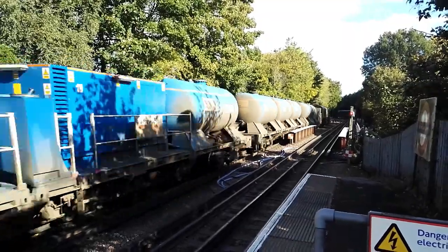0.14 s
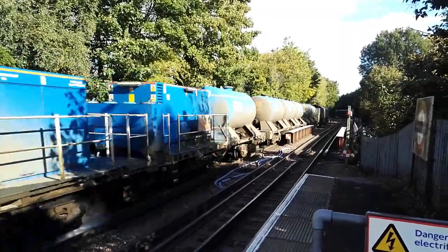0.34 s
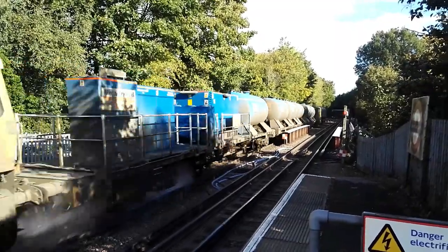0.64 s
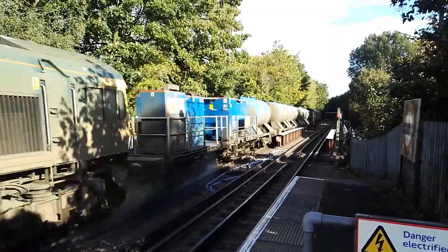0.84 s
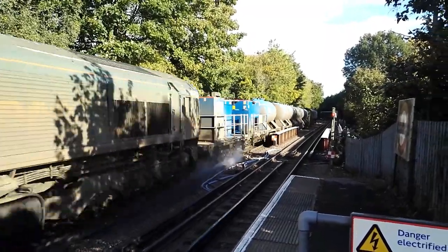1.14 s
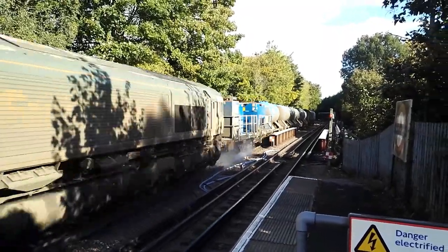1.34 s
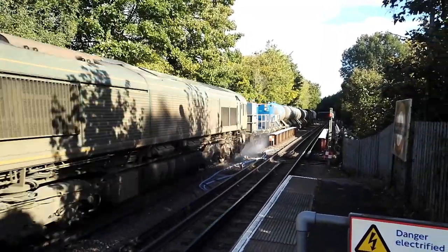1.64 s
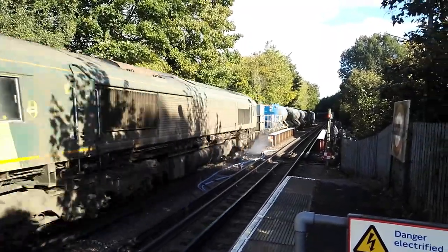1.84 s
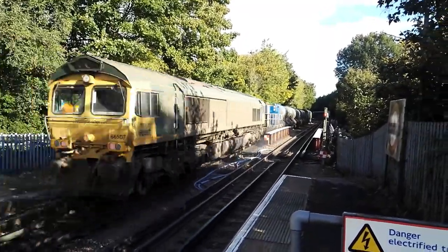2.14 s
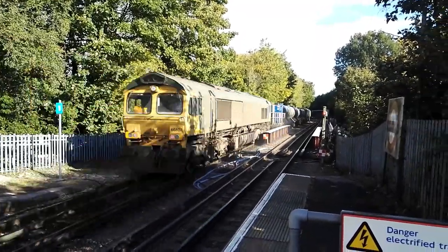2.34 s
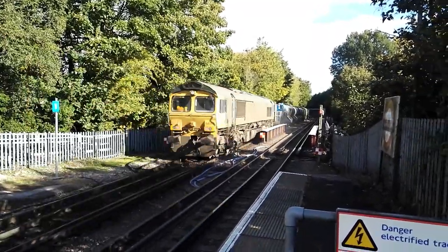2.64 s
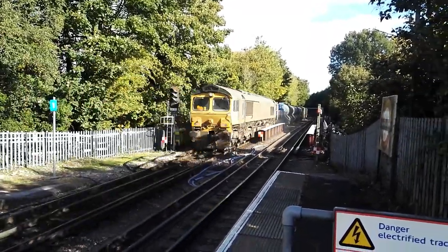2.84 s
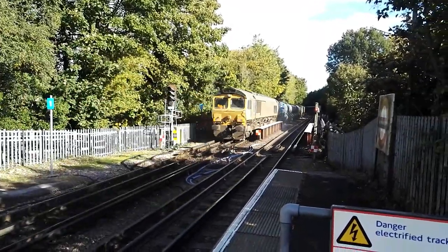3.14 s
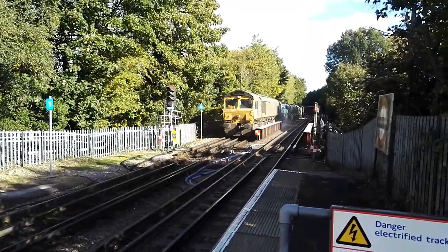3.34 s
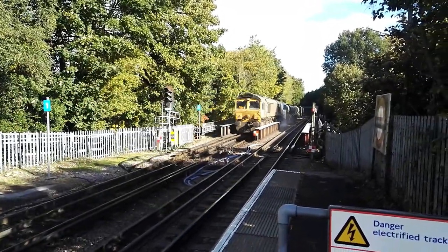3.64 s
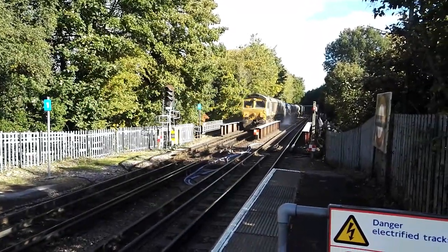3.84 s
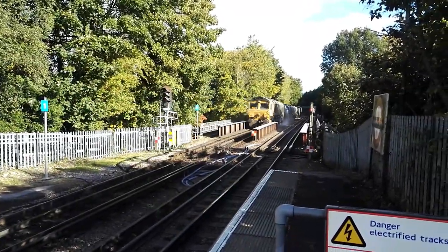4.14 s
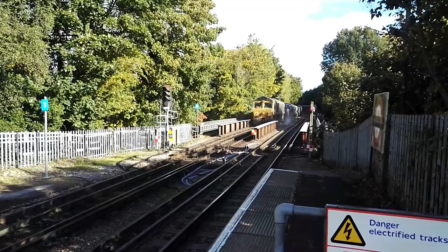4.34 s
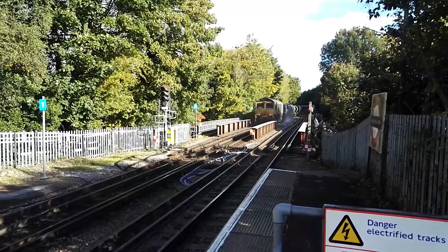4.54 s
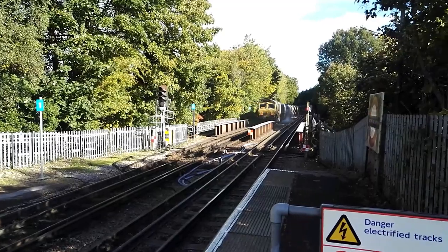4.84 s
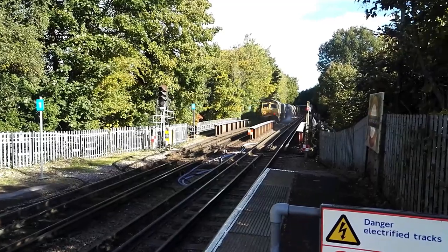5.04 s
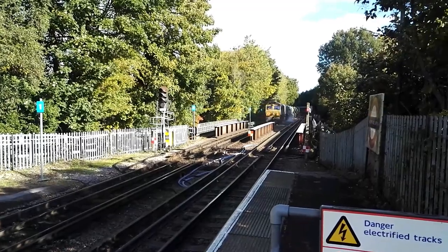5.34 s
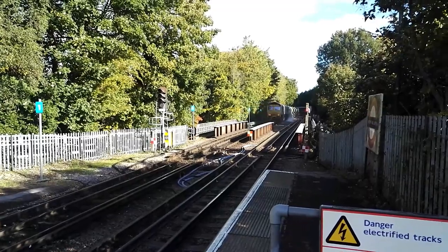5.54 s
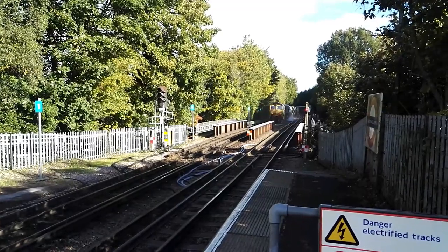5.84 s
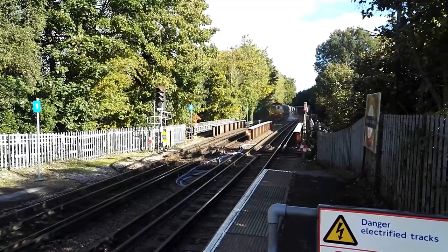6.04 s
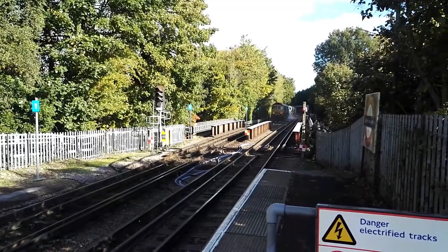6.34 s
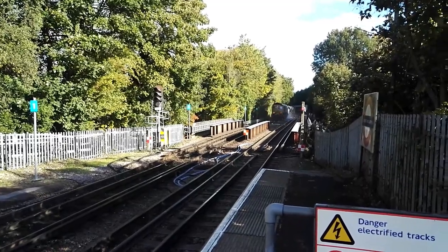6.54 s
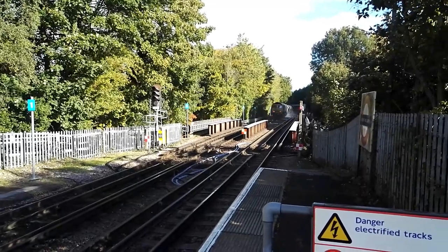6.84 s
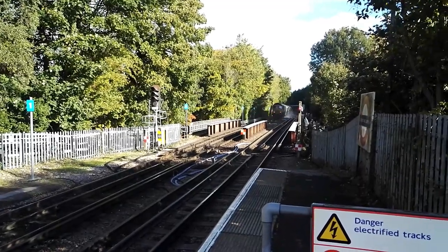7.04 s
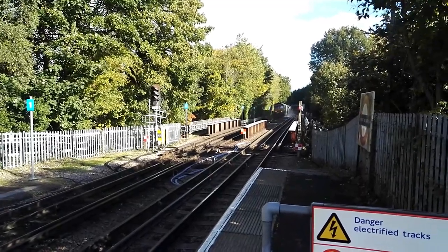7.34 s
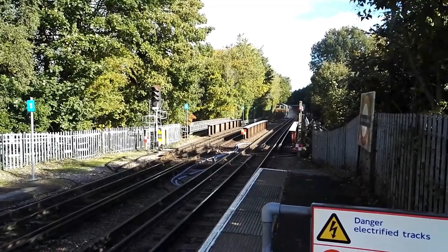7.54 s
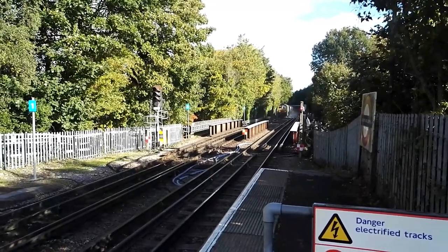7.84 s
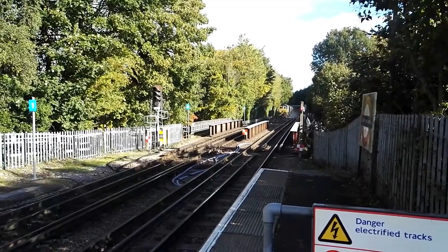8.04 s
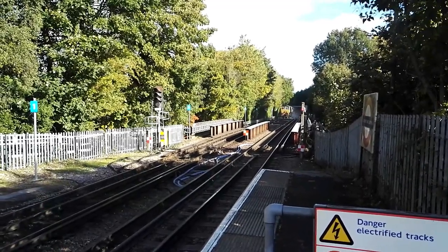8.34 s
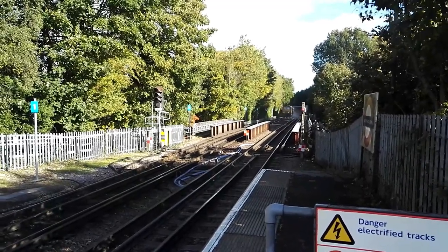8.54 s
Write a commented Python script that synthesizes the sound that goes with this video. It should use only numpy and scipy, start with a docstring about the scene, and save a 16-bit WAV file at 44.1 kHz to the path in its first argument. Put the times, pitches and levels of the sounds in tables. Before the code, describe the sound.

Close outdoor stereo from a station platform: a water-jetting train is already abreast, at its loudest, with bright crackling spray, rumbling bogies and rapid axle thuds. A diesel locomotive throbs past, an air valve spits, and wheels squeak faintly. After about two seconds it recedes; flanges sizzle over points, a steel bridge drones softly, and the hiss dulls and surges in the distance while breeze bumps the microphone.

```python
"""Rail-cleaning train passing a platform

Water jets and droplets are shaped random noise; wheel rumble, ringing rails and bridge are noise through resonances.
Axle blows excite decaying modes; the diesel and pump are harmonic series; fans and valve are noise bursts.
Parts of the train fade as powers of distance, and the hiss and rumble shift from near to far colours.
Far off, flanges sizzle through the points, a bridge booms, and a breeze buffets two microphone ports."""
import sys
import numpy as np
from scipy import signal
from scipy.fft import rfft, irfft, next_fast_len
from scipy.io import wavfile
from scipy.ndimage import uniform_filter1d

SR = 44100
rng = np.random.default_rng(int(sys.argv[2]) if len(sys.argv) > 2 else 0)


def bounce(signal):
    """Save signal as a 16-bit WAV file at the path given by the first command-line argument."""
    frames = np.transpose(np.atleast_2d(signal))
    limited = np.clip(frames, -1, 1)
    pcm = np.round(limited * 32767).astype(np.int16)
    wavfile.write(sys.argv[1], SR, pcm)


N = 384111

# In spectra and modes level_db is relative, since each sound is then scaled to rms 1.
# Surges of the train's noise, before each layer takes its share:
# start_s, rise_s, fade_s, hiss_db, roar_db, brightening (0-1)
SURGES = [(0, .024, 0.0097, 4, 11, 0), (3.22, 0.32, 0.43, 2.5, 1, 0.13), (4.35, .25, 0.6, 2, -2, 0.24),
          (5.33, 0.1, 0.81, 4, 4, 0.03), (6.64, .04, 0.77, 1.5, 4.5, 0.03), (7.93, 0.062, 1.6, 2, 4, 0.05)]
# Water jets and wheels hissing on wet track: abreast_s, gap_m, level_db (abreast)
HISSERS = [(-.05, 4.65, -22), (.6, 9.7, -33.5), (1.33, 3.3, -36.5), (1.88, 2.3, -44.5)]
# Dips of the hiss: centre_s, length_s, level_db
LULLS = [(2.944, 1.14, -3), (4.1, 0.93, -2.5), (6.447, 0.54, -1.8), (7.801, .35, -0.5)]
# Jet hiss, near and far: frequency_hz, level_db (per Hz)
HISS_NEAR = [(400, -10), (1000, -6), (1250, -4), (1700, -3.5), (2050, -1), (3200, -1), (4500, 1.5),
             (6200, 1), (8500, 6), (10500, 3), (12500, -1), (14200, 0)]
HISS_FAR = [(400, -23), (1100, 6), (1350, 2.5), (1600, 6.5), (2300, 2), (3300, 1.5), (4800, 1),
            (6200, -1.5), (8000, -4.5), (10000, -11), (11600, -11.5), (12400, -16.5), (14200, -21)]
# Wheel discs: pitch_hz, width_hz, level_db
WHEEL_MODES = [(1145, 110, 4), (1635, 30, -3), (2840, 40, 2), (4620, 160, -2), (11600, 400, -22)]
# Fine spray: frequency_hz, level_db (per Hz)
SPRAY_SPECTRUM = [(6000, -35.5), (8500, -11.5), (10300, -5), (11700, -1), (12800, -4.5), (14200, -7)]
# Bogies rolling by: abreast_s, gap_m, rumble_db, rail_ringing_db (both before the surges)
BOGIES = [(.08, 4.8, -42.5, -45), (.7, 4.3, -47.5, -49), (1.2, 5.5, -44, -49.5), (2.05, 2.8, -50.5, -50.5)]
# Wheel rumble, near and far: frequency_hz, level_db (per Hz)
RUMBLE_NEAR = [(20, -27.5), (40, -16), (58, -2.5), (80, 2), (105, 2.5), (130, -4.5), (175, -1), (250, -0.5),
               (315, -2.5), (380, -1), (470, -4.5), (560, -5.5), (900, -32), (1600, -30)]
RUMBLE_FAR = [(20, -8), (40, 0), (58, 12.5), (88, 5.5), (120, -5.5), (160, -0.5), (205, -0.5), (280, -1.5),
              (340, -10), (480, -6), (900, -8), (1600, -23.5)]
# Ringing rails, near and far: frequency_hz, level_db (per Hz)
RAILS_NEAR = [(350, -24), (500, -17.5), (600, -2.5), (680, -0.5), (745, 2), (795, -1.5), (860, -14.5),
              (1100, -24.5)]
RAILS_FAR = [(350, -17), (500, -8), (620, -1), (730, -1), (790, -3.5), (880, -10.5), (1100, -18.5)]
# Axle blows over rail joints: time_s, level_db (before the rattle and thud trims), pitch_hz
KNOCKS = [(0.019, -28, 211), (0.11, -35, 463), (0.129, -35, 404), (0.188, -32, 194), (0.31, -29.5, 242),
          (0.429, -39, 369), (0.489, -34, 269), (0.539, -33, 283), (0.609, -32, 272), (0.649, -38, 315),
          (0.738, -36, 175), (0.784, -40, 398), (0.892, -32, 180), (0.949, -34, 318), (1.024, -41, 248),
          (1.069, -35.5, 277), (1.099, -36, 317), (1.165, -32, 277), (1.285, -40, 175), (1.322, -37, 153),
          (1.359, -38, 159), (1.427, -35, 393), (1.719, -36, 106), (1.749, -35, 183), (1.847, -33, 110),
          (1.893, -38, 245), (1.977, -35, 183), (2.009, -35.5, 250), (2.238, -44, 410), (3.108, -52, 148)]
# Bogie frame: pitch_hz, level_db, decay_s
BOGIE_MODES = [(62, -9, .03), (108.6, -2.5, .028), (178, -0.5, 0.018), (240.6, -3, 0.014),
               (297.6, -1.5, .015), (400, -2.5, 0.012)]
# Rattle of an axle blow: frequency_hz, level_db (per Hz)
RATTLE_SPECTRUM = [(30, -24), (65, -2.5), (170, 0.5), (280, 2), (450, -8), (750, -12.5), (1200, -27.5),
                   (4000, -39)]
# Exhaust note as the locomotive goes by: time_s, level_db (before a trim and the final fade)
EXHAUST_LEVEL = [(0.0, -48), (0.05, -47), (0.1, -56), (0.28, -42.5), (0.48, -48.5), (0.82, -44.5),
                 (0.87, -62), (0.89, -50), (1.01, -45), (1.06, -56), (1.23, -49), (1.43, -64), (2.05, -52),
                 (2.07, -70), (2.55, -55.5), (2.58, -65), (2.71, -55), (2.77, -72.5), (2.81, -58),
                 (3.0, -69)]
# Diesel overtones: multiple of the firing rate, level_db
FIRING_ORDERS = [(1, -0.5), (2, -11.5), (3, -19), (4, -23.5)]
# Air valve: frequency_hz, level_db (per Hz)
VALVE_SPECTRUM = [(2500, -13), (4800, -8), (6500, -4), (8500, 2.5), (11000, 0), (14000, -1.5)]
# Cooling fans: frequency_hz, level_db (per Hz)
FAN_SPECTRUM = [(700, -24), (1200, -3), (1550, 2), (2150, 1), (2800, -18)]
# Pump pitch, dropping as the motor recedes: time_s, pitch_hz
PUMP_PITCH = [(1.1, 106.8), (2, 102.4)]
# Pump overtones: multiple of its pitch, level_db
PUMP_ORDERS = [(1, -6.5), (2, 0), (3, -2.5)]
# Wheel squeaks: centre_s, pitch_hz, level_db
SQUEAKS = [(1.509, 1917, -53), (1.655, 1657, -48), (1.811, 1600, -62), (1.97, 1650, -53.5),
           (2.11, 1545, -61.5), (2.29, 1640, -58), (2.6, 1654, -62), (2.902, 1690, -63)]
# Flanges scraping through the points: start_s, length_s, level_db
SCRAPES = [(2.273, 0.093, -53), (2.58, 0.087, -50.5), (3.217, 0.32, -62), (3.569, 0.19, -52.5),
           (3.8, 0.14, -57), (4.02, .05, -62), (4.159, 0.1, -52.5), (4.44, 0.075, -62), (4.86, 0.18, -58),
           (5.29, 0.24, -56.5), (5.628, .33, -69)]
# Flange scrape: frequency_hz, level_db (per Hz)
SCRAPE_SPECTRUM = [(8500, -8), (10200, -11), (11200, -2), (12000, -0.5), (13000, -5), (14200, -3)]
# Singing flange: centre_s, length_s, pitch_hz, level_db
SINGS = [(3.928, 0.16, 12350, -63), (5.461, .28, 12260, -61)]
# Wet wheels in the points: frequency_hz, level_db (per Hz)
SWISH_SPECTRUM = [(2500, -14), (4500, -3), (6500, -1), (9000, 0), (12000, -8)]
# Steel bridge: pitch_hz, width_hz, level_db
BRIDGE_MODES = [(164, 28, 0)]
# Faint tones from down the line: pitch_hz, width_hz, level_db
FAR_TONES = [(309, 26, -74.5), (2920, 45, -76), (4620, 80, -77)]
# Gusts on the ports: centre_s, length_s, left_db, right_db
GUSTS = [(4.27, 0.15, -57, -58.5), (4.408, 0.1, -54, -47), (4.497, .04, -66, -49.5), (4.566, 0.1, -65, -55),
         (4.66, .04, -66, -55), (4.693, 0.026, -59, -47.5), (4.84, 0.12, -60, -59),
         (4.969, 0.097, -55, -49), (5.04, 0.032, -70, -56), (5.395, 0.033, -50.5, -59),
         (5.448, .035, -62, -52), (5.515, 0.097, -55.5, -62), (5.605, 0.047, -61, -52),
         (5.688, .12, -57.5, -63), (5.774, 0.032, -60, -48.5), (5.915, 0.22, -65, -60.5),
         (6.431, 0.087, -61, -54.5), (6.528, 0.054, -62, -56), (6.578, .035, -72, -55),
         (6.643, 0.034, -68, -54)]
# Wind at a port: frequency_hz, level_db (per Hz)
GUST_SPECTRUM = [(20, -1), (60, 4), (150, 2.5), (290, -3.5), (430, -14), (800, -33), (2000, -50)]
# Balance of the two microphone ports: frequency_hz, left_minus_right_db
PORT_BALANCE = [(100, 0.2), (350, -0.3), (1000, 1.5), (2500, 1.5), (4000, -1.7), (5800, -5), (7500, -2),
                (9300, 3), (11500, 3.5), (14000, 2.5)]

SPEED_M_PER_S = 14.14
# farness crosses zero at NEAR_UNTIL_S and approaches FARTHEST over the scale DULLING_M
NEAR_UNTIL_S, DULLING_M, FARTHEST = 0.37, 69.4, 1.18
SCRAPE_ATTACK_S, SCRAPE_RELEASE_S = 0.032, 0.09
FIRING_HZ = 73
PORT_SPACING_S = 0.00052  # travel time of sound between the ports
# how far the left port leads for sound from beside the platform and from down the line
LEAD_BESIDE_MS, LEAD_AHEAD_MS = 0.442, -0.082
EDGE_HZ = 14240  # upper band limit
T = np.arange(N) / SR
SIZE = next_fast_len(N)
HZ = np.fft.rfftfreq(SIZE, 1 / SR)


def amp(db):
    """Logarithmic level: decibels to pressure gain."""
    return np.exp(np.asarray(db) * (np.log(10) / 20))


def evened(x):
    """Mean power: scales a signal to rms 1."""
    return x / np.sqrt(np.mean(x ** 2) + 1e-20)


def steadied(x, size=1100):
    """Short-time power: holds rms 1 over a sliding window, so a short burst has its full weight."""
    power = abs(uniform_filter1d(x ** 2, size=size, axis=-1))
    return x / np.sqrt(power + 1e-9)


def colour(points, hz):
    """Spectral envelope: interpolates decibels on a log-frequency axis."""
    f, db = np.transpose(points)
    return np.interp(np.log(hz + 1), np.log(f), db)


def band(points, hz):
    """Band limiting: an envelope that falls 20 dB per octave further past its ends."""
    inside = np.clip(hz + 1, points[0][0], points[-1][0])
    return colour(points, hz) - 20 * abs(np.log2((hz + 1) / inside))


def tinted(x, spectrum):
    """Linear filtering: multiplies by a spectral envelope, to rms 1."""
    return evened(irfft(rfft(x, SIZE) * amp(band(spectrum, HZ)), SIZE)[..., :N])


def drift(rate_hz, size=2048):
    """Low-pass random modulation: a slow wander of rms 1."""
    hz = np.fft.rfftfreq(size, T[-1] / size)
    wander = irfft(rfft(rng.standard_normal(size)) * np.exp(-(hz / rate_hz) ** 2))
    return evened(np.interp(T, np.linspace(0, T[-1], size), wander))


def pan(side_db):
    """Interaural level difference: left and right gains, positive to the left."""
    return amp(np.array([[.5], [-.5]]) * side_db)


def bell(centre_s, length_s):
    """Gaussian envelope: length_s spans its 1/e points."""
    offset = 2 * (T - centre_s).astype(np.float32) / length_s
    return np.exp(-np.minimum(offset ** 2, 20))


def burst(start_s, attack_s, length_s, release_s, t=T):
    """Exponential decay: a linear rise, a hold to length_s after the start, then decay."""
    age = (t - start_s).astype(np.float32)
    return np.clip(age / attack_s, 0, 1) * np.exp(-np.clip((age - length_s) / release_s, 0, 20))


def passing(abreast_s, gap_m, falloff):
    """Geometric spreading: gain 1 abreast, falling as a power of distance."""
    along_m = SPEED_M_PER_S * (T - abreast_s).astype(np.float32)
    return (1 + (along_m / gap_m) ** 2) ** (-falloff / 2)


def together(*gains):
    """Incoherent addition: unrelated noises add in power."""
    return np.sqrt(sum(gain ** 2 for gain in gains))


def surge(share):
    """Amplitude modulation: gain of a hissing layer that takes a share of the surges."""
    lift_db = sum(db * burst(s, rise, rise, fade) for s, rise, fade, db, _, _ in SURGES)
    return amp(share * lift_db)


def farness(t):
    """Dulling with distance: near 0 to about 1 far; a surge brightens it for a while."""
    receded = FARTHEST * (1 - np.exp(-SPEED_M_PER_S * (t - NEAR_UNTIL_S) / DULLING_M))
    bright = sum(share * burst(s, rise, rise, fade, t) for s, rise, fade, _, _, share in SURGES)
    return receded - bright


def noise(near, far, patchy_db, direct_near, direct_far, size):
    """Partial coherence: turbulent noise at two ports, direct and diffuse, rms 1, following farness."""
    hz = np.fft.rfftfreq(size, 1 / SR)
    t = np.arange(4 * N // size + 5) * size / 4 / SR
    a, b, c, d, patches = rng.standard_normal((5, len(t), len(hz)), dtype=np.float32)
    patches = uniform_filter1d(patches, size=12, axis=0)  # smooth in time, then in frequency
    patches = evened(uniform_filter1d(patches, size=3, axis=1))
    away = farness(t)[:, None].astype(np.float32)
    # part arrives direct, from beside or from ahead, the rest from all sides
    beside = np.clip(direct_near * (1 - 2 * away), 0, 1)
    ahead = np.clip(direct_far * away, 0, 1)
    direct = beside * np.exp(-2j * np.pi * hz * LEAD_BESIDE_MS / 1000)
    direct = direct + ahead * np.exp(-2j * np.pi * hz * LEAD_AHEAD_MS / 1000)
    diffuse = np.clip(0.78 + 0.14 * away, 0, 1) * np.sinc(2 * hz * PORT_SPACING_S)
    # direct sound loses its coherence at short wavelengths
    same = (1 - beside - ahead) * diffuse + direct / (1 + (hz / 6500) ** 4)
    same = same.astype(np.complex64)
    left = a + 1j * b
    right = same * left + np.sqrt(np.maximum(1 - abs(same) ** 2, 0)) * (c + 1j * d)
    ports = np.array([left, right])
    level_db = (1 - away) * band(near, hz) + away * band(far, hz) + patchy_db * patches
    ports *= amp(level_db).astype(np.float32)
    _, sound = signal.istft(ports, nperseg=size, noverlap=size - size // 4, time_axis=1, freq_axis=2)
    return evened(sound[:, :N])


def ring(modes, channels=2):
    """Resonance: modes kept going by random rubbing, rms 1."""
    response = sum(amp(db) / (1 + (2 * (HZ - hz) / width) ** 2) for hz, width, db in modes)
    rubbing = rng.standard_normal((channels, N))
    return evened(irfft(rfft(rubbing, SIZE) * response, SIZE)[:, :N])


def hum(pitch_hz, orders, waver, throb_db):
    """Harmonic series: a motor note with overtones that each throb a little, rms 1."""
    turns = np.cumsum(pitch_hz * (1 + waver * drift(5.3))) / SR
    note = 0
    for k, db in orders:
        overtone = np.sin(2 * np.pi * (round(k) * turns + rng.random()))
        note = note + amp(db + throb_db * drift(9.94)) * overtone
    return evened(note)


def hiss(falloff=1.62, far_db=-61.0, discs_db=-19):
    """Turbulent noise: jets scour the rails, the locomotive runs over wet track, discs sing from afar."""
    level = together(amp(far_db), *(amp(db) * passing(s, gap, falloff) for s, gap, db in HISSERS))
    wash = noise(HISS_NEAR, HISS_FAR, patchy_db=2.0, direct_near=0.16, direct_far=0.38, size=1024)
    discs = ring(WHEEL_MODES) * amp(discs_db) * np.clip(farness(T), 0, 1)
    lull = amp(sum(db * bell(s, length) for s, length, db in LULLS))
    return (wash + discs) * level * lull * surge(share=0.93)


def sizzle(level_db=-19, air_db_per_m=0.82, side_db=9.5, centring_m=38,
           grain_db=3.5, drops_per_s=2500, grainy=.55, reach_s=1.53):
    """Impulse noise and air absorption: drops tick in smooth fizz, moving from the left to the centre."""
    ticks = (rng.random((2, N)) < drops_per_s / SR) * rng.choice([-1, 1], (2, N))
    drop_db = grain_db * np.minimum(rng.exponential(1, (2, N)), 2)
    ticks = evened(ticks * amp(drop_db))
    share = np.clip(grainy, 0, 1) * np.exp(-T / reach_s)  # single drops are heard only close by
    mixed = np.sqrt(share) * ticks + np.sqrt(1 - share) * rng.standard_normal((2, N))
    fizz = tinted(mixed, SPRAY_SPECTRUM)
    gone_m = SPEED_M_PER_S * T
    sides = pan(side_db * np.exp(-gone_m / centring_m))
    sides = sides / np.sqrt(np.mean(sides ** 2, axis=0))
    level = amp(level_db - air_db_per_m * gone_m) * passing(abreast_s=-.01, gap_m=3.76, falloff=1.26)
    return fizz * level * surge(share=1.0) * sides


def rolling(far_rumble_db=-64.5, far_rails_db=-70, rumble_share=0.27):
    """Roughness excitation: wheels shake bogies and ring the rails; the rest of the train murmurs."""
    rumble = noise(RUMBLE_NEAR, RUMBLE_FAR, patchy_db=2.5, direct_near=0.21, direct_far=0.29, size=2048)
    rails = noise(RAILS_NEAR, RAILS_FAR, patchy_db=1.4, direct_near=0.64, direct_far=0.74, size=2048)
    bogies = [amp(db) * passing(s, gap, falloff=1.44) for s, gap, db, _ in BOGIES]
    shaking = together(amp(far_rumble_db), *bogies)
    rung = [amp(db) * passing(s, gap, falloff=1.26) for s, gap, _, db in BOGIES]
    ringing = together(amp(far_rails_db), *rung)
    lift_db = sum(db * burst(s, rise, rise, fade) for s, rise, fade, _, db, _ in SURGES)
    return rumble * shaking * amp(rumble_share * lift_db) + rails * ringing * amp(lift_db)


def knocks(rise_s=0.000992, decay_s=0.017, scatter=0.46, rattle_db=-11, thud_db=-2.5,
           detune=.05, spread_oct=.7, skew_ms=0.39):
    """Modal impact: a blow excites its bogie's modes, most of all near its own pitch, and a rattle."""
    blows, thuds, age = np.zeros(N), np.zeros((2, N)), T[:SR // 8]
    onset = 1 - np.exp(-age / rise_s)
    hz, mode_db, ring_s = np.transpose(BOGIE_MODES)[:, :, None]
    for s, db, pitch_hz in KNOCKS:
        at = round(s * SR)
        blows[at] = amp(db)
        share = amp(mode_db) / (1 + (np.log2(hz / pitch_hz) / spread_oct) ** 2)
        turns = hz * (1 + detune * rng.standard_normal(hz.shape)) * age + rng.random(hz.shape)
        # each mode reaches the two ports by its own path
        turns = turns + hz * skew_ms / 1000 * rng.standard_normal((2, *hz.shape))
        modes = share * np.exp(-age / ring_s) * np.sin(2 * np.pi * turns)
        thud = modes.sum(1) / np.linalg.norm(share)
        thuds[:, at:at + len(age)] += amp(db) * onset * thud
    shaking = signal.oaconvolve(blows, onset * np.exp(-age / decay_s))[:N]
    shared = rng.standard_normal(N)
    rattle = steadied(tinted(shared + scatter * rng.standard_normal((2, N)), RATTLE_SPECTRUM))
    return amp(rattle_db) * rattle * shaking + amp(thud_db) * thuds


def judder(per_s=18, size_db=4, level_db=-9, detune=.08, side_db=14, count=3):
    """Repeated impact: tread pits keep up an early patter of detuned mode taps as the bogies pass."""
    age = T[:SR // 8]
    patter = np.zeros((2, N))
    for hz, db, ring_s in BOGIE_MODES * count:
        tuned_hz = hz * (1 + detune * rng.standard_normal())
        tap = amp(db) * np.exp(-2 * age / ring_s) * np.sin(2 * np.pi * tuned_hz * age)
        for k, (late, size, side) in enumerate(rng.uniform(-1, 1, size=(20, 3))):
            at = int((k + 1 + late) * count / per_s * SR)
            part = patter[:, at:][:, :len(tap)]  # a view into the patter
            part += amp(size_db * size) * pan(side_db * side) * tap[:part.shape[1]]
    level = together(*(amp(db) * passing(s, gap, falloff=1.97) for s, gap, db, _ in BOGIES))
    return amp(level_db) * evened(patter) * level


def engine(near_db=-1.0, gone_s=3.05, fade_s=0.22, far_db=-67.5, late_db=-63,
           octave_db=-73, rough=0.44, exhaust_width_hz=18):
    """Periodic firing: harmonics in rough exhaust throb abreast and swell from afar; an octave stands out."""
    near = amp(near_db + np.interp(T, *np.transpose(EXHAUST_LEVEL)))
    near = near * np.exp(-np.maximum(T - gone_s, 0) / fade_s)
    level = together(near, amp(far_db), amp(late_db) * bell(centre_s=8.25, length_s=0.75))
    octave = hum(FIRING_HZ, [(2, 0)], waver=0.0078, throb_db=1.5)
    octave = octave * amp(octave_db) * bell(centre_s=3.93, length_s=2.2)
    exhaust = rough * ring([(FIRING_HZ, exhaust_width_hz, 0)], channels=1)
    firing = hum(FIRING_HZ, FIRING_ORDERS, waver=0.00403, throb_db=1.2)
    return (firing + exhaust) * level + octave


def valve(open_s=1.253, length_s=0.2, air_db=-30.0, fizz_db=-29):
    """Jet noise: compressed air spits from the locomotive; a higher fizz builds until the valve shuts."""
    air = tinted(rng.standard_normal((2, N)), VALVE_SPECTRUM)
    air = air * burst(open_s, attack_s=0.041, length_s=length_s, release_s=.028)
    fizz = tinted(rng.standard_normal((2, N)), SPRAY_SPECTRUM)
    fizz = fizz * burst(open_s, attack_s=0.13, length_s=length_s, release_s=0.073) ** 2
    return amp(air_db) * air * pan(side_db=-5.5) + amp(fizz_db) * fizz * pan(side_db=1.0)


def fans(level_db=-59, start_s=2.12, attack_s=0.13, length_s=0.32, release_s=0.63):
    """Broadband flow noise: cooling fans rush from round the cab as the train's end clears the platform."""
    rush = tinted(rng.standard_normal((2, N)), FAN_SPECTRUM)
    return rush * amp(level_db) * burst(start_s, attack_s, length_s, release_s)


def pump(near_db=-58.0, late_db=-71):
    """Harmonic series: the motor driving the jets hums, fades, then drifts back faintly from afar."""
    near = amp(near_db) * passing(abreast_s=0.55, gap_m=12, falloff=3.3)
    level = together(near, amp(late_db) * bell(centre_s=8.5, length_s=5.3))
    pitch_hz = np.interp(T, *np.transpose(PUMP_PITCH))
    return hum(pitch_hz, PUMP_ORDERS, waver=0.009, throb_db=2.2) * level


def squeaks(length_s=0.085, waver=0.007, chatter_db=2.5):
    """Frictional vibration: rubbing wheels give short tones, chattering in pitch and level."""
    sound = np.zeros((2, N))
    lowpass = signal.butter(2, 60, fs=SR, output="sos")
    for s, hz, db in SQUEAKS:
        near = abs(T - s) < 2 * length_s
        for port in sound:
            wobble, chatter = (evened(signal.sosfilt(lowpass, rng.standard_normal(SR))[-near.sum():])
                               for _ in range(2))
            turns = np.cumsum(hz * (1 + waver * wobble)) / SR
            tone = np.sin(2 * np.pi * turns) * amp(chatter_db * chatter)
            port[near] += amp(db) * evened(tone) * bell(s, length_s)[near]
    return sound


def flange(width_hz=70, ragged_db=2.0, graze_db=-65.0, judder_db=1.3, judder_hz=22):
    """Friction and resonance: flanges scrape in ragged bursts, and now and then a high wheel mode sings."""
    scrape = noise(SCRAPE_SPECTRUM, SCRAPE_SPECTRUM, patchy_db=ragged_db,
                   direct_near=0, direct_far=0, size=1024)
    rubbing = sum(amp(db) * burst(s, SCRAPE_ATTACK_S, length, SCRAPE_RELEASE_S) for s, length, db in SCRAPES)
    # light contact all through the points
    rubbing = together(rubbing, amp(graze_db) * bell(centre_s=3.3, length_s=1.7))
    singing = sum(amp(db) * bell(s, length) * ring([(hz, width_hz, 0)]) for s, length, hz, db in SINGS)
    return scrape * rubbing * amp(judder_db * drift(judder_hz)) * pan(side_db=-0.5) + singing


def swish(level_db=-53, start_s=3.1, attack_s=0.43, length_s=0.32, release_s=0.21):
    """Broadband splash noise: a bright swish as the wet wheels run into the points."""
    splash = tinted(rng.standard_normal((2, N)), SWISH_SPECTRUM)
    return splash * amp(level_db) * burst(start_s, attack_s, length_s, release_s)


def bridge(level_db=-66.0, boom_db=-68, boom_hz=58, boom_width_hz=26):
    """Structural resonance: the bridge booms and drones as the locomotive rolls on and crosses."""
    boom = ring([(boom_hz, boom_width_hz, 0)], channels=1)
    boom = boom * amp(boom_db) * bell(centre_s=3.57, length_s=1.3)
    drone = ring(BRIDGE_MODES, channels=1) * amp(level_db)
    return boom + drone * burst(start_s=2.93, attack_s=0.31, length_s=0.37, release_s=0.5)


def whine(start_s=7.95, attack_s=.08, length_s=0.53, release_s=.6):
    """Narrow-band resonance: faint tones carry back from the distant train with the last surge."""
    tones = sum(amp(db) * ring([(hz, width, 0)], channels=1) for hz, width, db in FAR_TONES)
    return tones * burst(start_s, attack_s, length_s, release_s)


def wind():
    """Turbulent pressure: eddies hit each port on their own, in short thumps."""
    gusts = sum(amp([[left], [right]]) * bell(s, length) for s, length, left, right in GUSTS)
    return steadied(tinted(rng.standard_normal((2, N)), GUST_SPECTRUM)) * gusts


def scene(flutter_db=.3, flutter_hz=16):
    """Superposition: the train, its water noise fluttering, and the breeze."""
    water = (hiss() + sizzle()) * amp(flutter_db * drift(flutter_hz)) + swish()
    running_gear = rolling() + bridge() + knocks() + judder() + squeaks() + flange()
    machinery = engine() + fans() + pump() + whine() + valve()
    return water + running_gear + machinery + wind()


def record(dry):
    """Transducer response: the colour of each port, soft overload of the peaks, then a band limit."""
    size = next_fast_len(N + SR // 10)
    gains = pan(colour(PORT_BALANCE, np.fft.rfftfreq(size, 1 / SR)))
    heard = irfft(rfft(dry, size) * gains, size)[:, :N]
    heard = heard / (1 + (heard / .85) ** 4) ** .25
    lowpass = signal.firwin(1023, EDGE_HZ, window=("kaiser", 9), fs=SR)
    return signal.oaconvolve(heard, lowpass[None], "same")


dry = scene()
out = record(dry)
bounce(out)
```